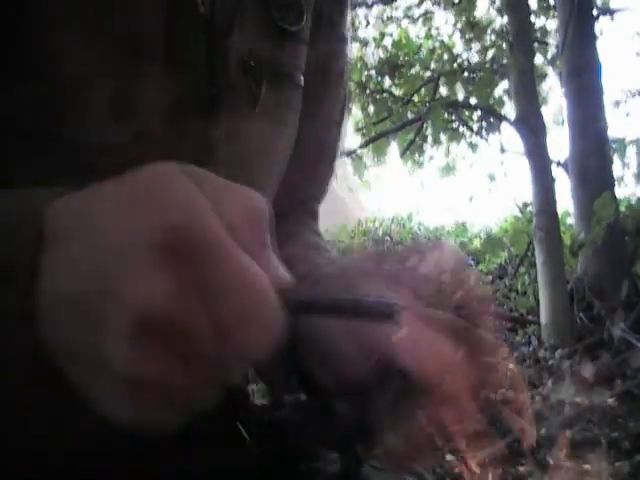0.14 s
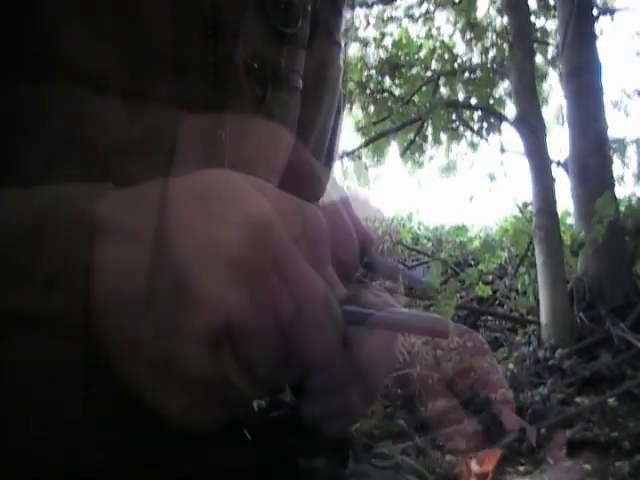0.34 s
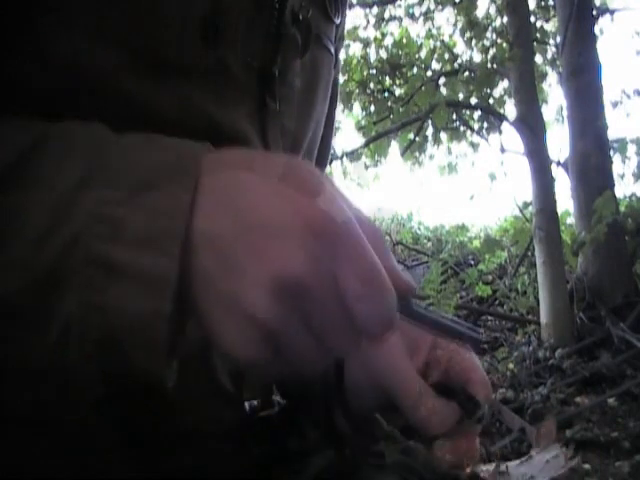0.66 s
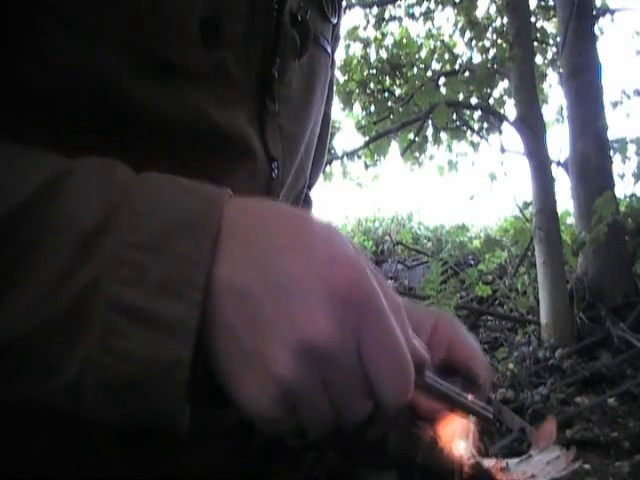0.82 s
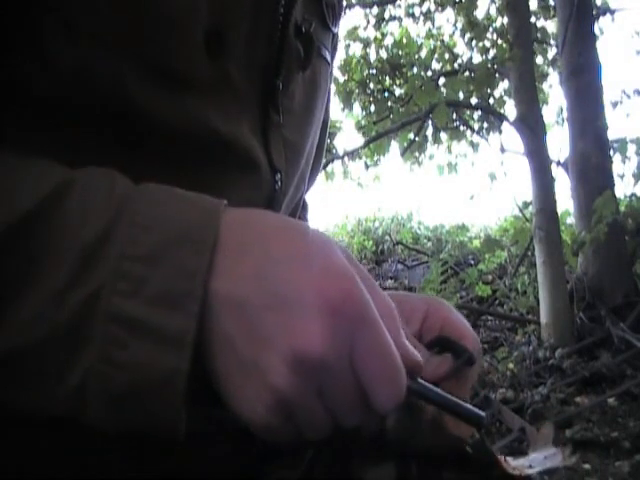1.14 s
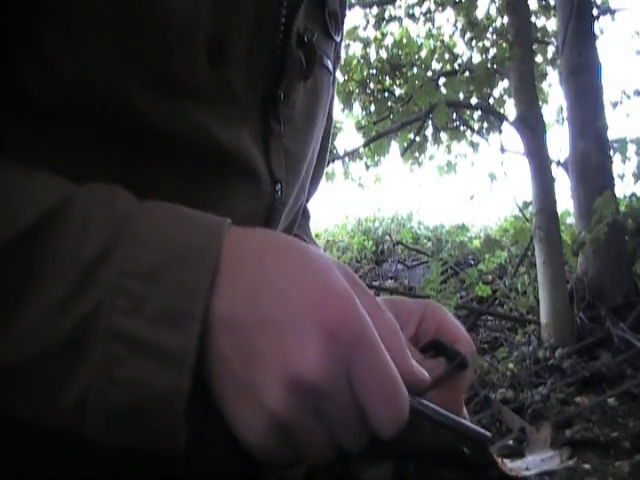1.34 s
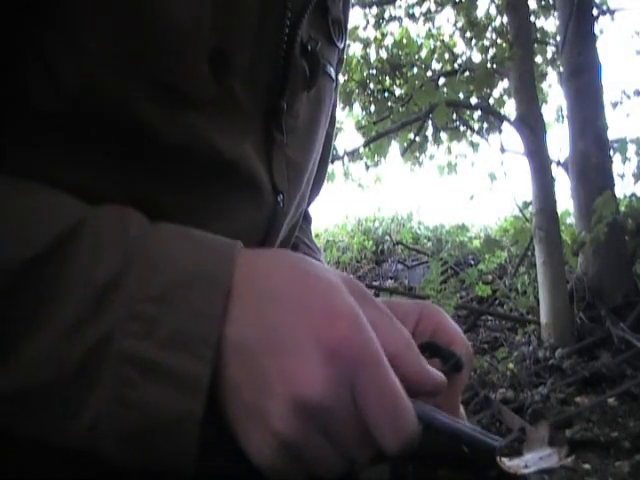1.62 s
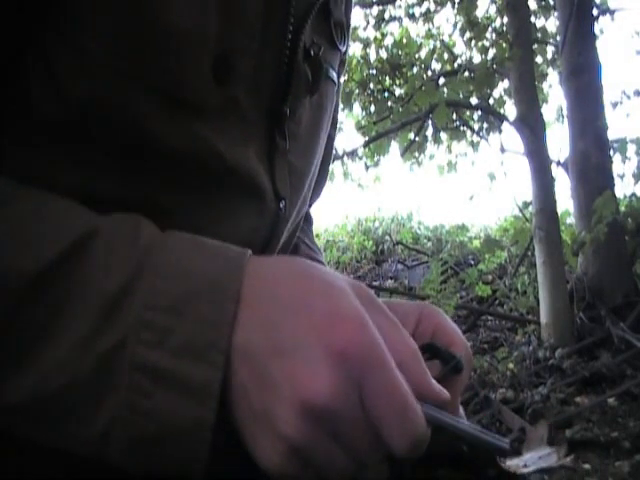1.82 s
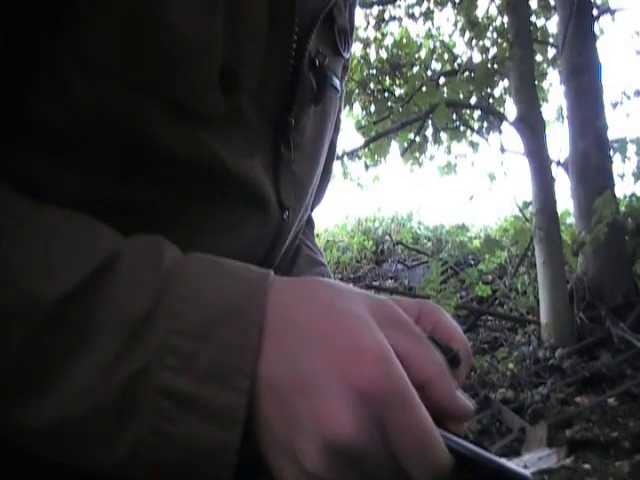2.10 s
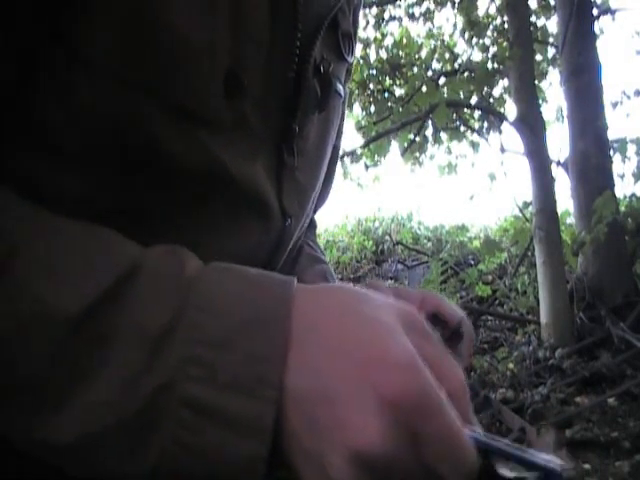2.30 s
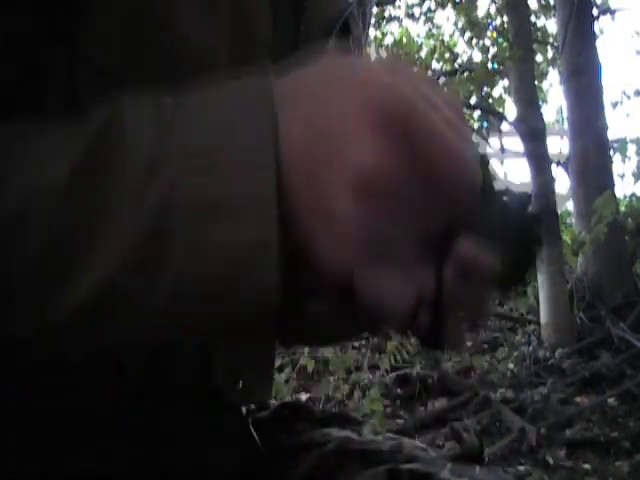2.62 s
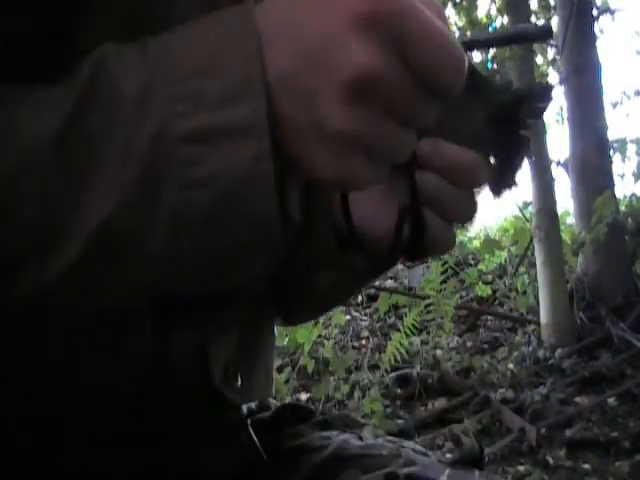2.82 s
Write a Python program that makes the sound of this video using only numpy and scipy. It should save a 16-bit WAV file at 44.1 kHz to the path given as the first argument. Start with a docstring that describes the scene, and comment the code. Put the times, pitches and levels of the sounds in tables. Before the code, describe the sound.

A metal striker rasps brightly down a fire steel, close to the microphone, followed by short scrapes and ticks. The tools knock once, then shift with soft taps, rustles and a faint jingle over a low, distant woodland rush.

```python
"""One long, bright rasp of a striker down a fire steel is heard close by, then short scrapes and ticks.
Friction drives the rasp and impacts make the ticks; both excite the brief resonance of the rod. The tools knock
once on the tinder and are shifted with dull taps, a rustle and a faint, high jingle. Behind them lies a low,
distant rush, with a nearer hiss."""
import sys
import numpy as np
from scipy import signal
from scipy.fft import rfft, irfft, next_fast_len
from scipy.io import wavfile
from scipy.ndimage import map_coordinates

SR = 44100
rng = np.random.default_rng(int(sys.argv[2]) if len(sys.argv) > 2 else 0)


def to_wav(s):
    """Save 16-bit WAV."""
    ch = np.atleast_2d(s).T  # columns
    pcm = np.round(np.clip(ch, -1, 1) * 32767)  # PCM
    wavfile.write(sys.argv[1], SR, pcm.astype(np.int16))


N = 130095
T = np.arange(N) / SR

# Envelope of the long stroke: time_s, skid_level_db, bite_level_db
STROKE_LEVELS = [(.023, -61, -59), (.029, -41.5, -44), (.048, -49, -48), (.066, -36, -39.5),
                 (.082, -26.5, -49), (.122, -24, -33), (.130, -29, -26), (.133, -22, -17.5),
                 (.144, -23, -21.5), (.148, -28, -26.5), (.168, -37, -28), (.177, -38, -24),
                 (.182, -40, -26), (.194, -46, -23), (.209, -48, -30.5), (.224, -44, -24.5),
                 (.243, -60, -30), (.256, -43, -28), (.272, -58, -42), (.312, -45, -42)]
# Spectra of the edge skidding and biting: frequency_hz, gain_db
SKID_SPECTRUM = [(300, -59), (2000, -15.5), (5800, -17), (7300, -6.5), (8000, -0.5), (8600, -1),
                 (9900, -3.5), (10800, -7), (11500, -7.5), (12800, -11), (14300, -25)]
BITE_SPECTRUM = [(60, -27.5), (200, -16), (560, -5), (1000, -7), (1520, -12), (2050, -6), (3150, -1),
                 (3700, -1), (4400, -6.5), (6300, -1.5), (7500, -1), (9400, -2), (10600, -5), (12400, -3.5),
                 (14200, -20.5)]
CHATTER_DB, STROKE_RELEASE_DB_PER_S = 1.2, 1200
def long_stroke():
    """Sliding friction: the chattering edge skids with a hiss, then bites and tears off sparks."""
    chatter_db = CHATTER_DB * wobble(rate_hz=420)
    release_db = STROKE_RELEASE_DB_PER_S * np.maximum(T - STROKE_LEVELS[-1][0], 0)
    skid, bite = amp(curve(STROKE_LEVELS) - release_db + chatter_db)
    fine, coarse = grains(per_s=20000, spread_db=3), grains(per_s=12000, spread_db=3.5)
    return coloured(skid * fine, SKID_SPECTRUM) + coloured(bite * coarse, BITE_SPECTRUM)


# Short strokes of the edge: start_s, length_s, level_db, body_db
SHORT_STROKES = [(.3225, 0.0052, -23.5, -8), (.334, 0.0042, -39, -2), (.362, 0.0074, -35.5, -5.5),
                 (.411, 0.0061, -29.5, -3.5), (.416, 0.011, -30, -4), (.442, 0.0048, -39.5, 2.5),
                 (.5155, 0.019, -32.5, -1), (.559, 0.021, -36.5, 4), (.563, 0.0035, -35, -8),
                 (.928, 0.0032, -30, -2), (.9335, 0.014, -35.5, -2), (.946, 0.0085, -40, 9),
                 (1.427, 0.008, -31, -4.5), (1.456, 0.004, -46, -1)]
def scrapes():
    """Friction in brief bursts: the edge bites the rod with a gritty rasp."""
    grit = grains(per_s=9000, spread_db=4) * amp(CHATTER_DB * wobble(rate_hz=450))
    return coloured(rubbed(SHORT_STROKES, grit, attack_s=0.00095, release_s=0.0029), BITE_SPECTRUM)


# Contacts of steel on steel: start_s, relative_level_db, body_db
STEEL_CONTACTS = [(.0305, -25.5, 0), (0.052, -28, -10), (.1083, -11, 2), (.1197, -7, -10), (.1325, -10, -3),
                  (.1445, -2, -19), (.1775, -4, -10), (.1864, -11, 1), (.2011, -13, -4), (.2365, -19, -1),
                  (.2532, -15, -11), (.2828, -22, 0), (.2942, -18.5, 6), (.3066, -16, -1), (.3275, -9.5, 7),
                  (.3686, -29, 0), (.3767, -27, 4), (.4244, -9.5, 0.5), (.4751, -21, -8), (.5158, -22, -4),
                  (.5295, -17, -12), (.5654, -11.5, 1), (.5765, -21, -5), (.6075, -30, -6), (.7947, -8, 3),
                  (.7964, -6.5, 1), (0.8331, -27, -8), (.9272, -11, -2), (.9494, -16, 7), (.9538, -10, 0),
                  (1.0903, -30.5, -4), (1.372, -19, -3), (1.3738, -26, -7), (1.4424, -29, 1),
                  (1.4926, -30.5, -3), (2.8585, -26, -5), (2.8714, -22, -12)]
# Spectrum of a contact: frequency_hz, gain_db
TICK_SPECTRUM = [(80, -27), (500, -25), (1000, -7), (1550, -19.5), (2200, -6), (2600, -5), (3200, 3.5),
                 (3700, 3), (4800, -18), (6100, 3), (7600, -3), (9500, 4.5), (12500, -1), (14000, -24)]
def ticks():
    """Hard impact: the edge catches or taps the rod, and so short a pulse has a broad spectrum."""
    return coloured(struck(STEEL_CONTACTS, decay_s=0.00062), TICK_SPECTRUM)


# Modes of the rod: pitch_hz, bandwidth_hz, relative_gain_db
ROD_MODES = [(3140, 24, 0), (6270, 32, -3), (8040, 36, -10), (8730, 80, 0), (9580, 79, 2.5)]
def rod_resonance(contacts):
    """Damped resonance: the hand-held steel adds a short ring to every contact."""
    def response(hz):
        return sum(amp(db) * 1j * hz * width / (pitch ** 2 - hz ** 2 + 1j * hz * width)
                   for pitch, width, db in ROD_MODES)
    return contacts + amp(-3) * filtered(contacts, response)


# Spectra of the knock's hard and dull parts: frequency_hz, gain_db
CLACK_SPECTRUM = [(200, -27), (1700, -15), (2250, -1.5), (2600, -7.5), (2950, 1), (3650, 5), (4200, -30),
                  (5300, -39), (5900, -3), (7700, -18), (8200, 4.5), (10500, 0), (12500, -9), (14000, -37)]
THUD_SPECTRUM = [(40, -44), (120, -14), (200, -2.5), (380, 3.5), (520, -3), (900, 1), (1400, -5.5),
                 (2200, -29)]
def knock(start_s=.9441, clack_db=8, thud_db=-3.5):
    """Impact: the tools come down on the tinder with a hard clack over a dull thud."""
    clack = coloured(placed(burst(decay_s=0.002), start_s), CLACK_SPECTRUM)
    thud = coloured(placed(burst(decay_s=0.002), start_s), THUD_SPECTRUM)
    return amp(clack_db) * clack + amp(thud_db) * thud


# Bumps of the tools in the hands: start_s, relative_level_db, body_db
HAND_TAPS = [(.8687, -21, 0), (2.1023, -35.5, 14), (2.272, -35.5, 10), (2.4119, -30.5, 6), (2.4193, -32, 4),
             (2.8055, -20, 1.5)]
# Spectrum of handling, sleeve and dry litter: frequency_hz, gain_db
HANDLING_SPECTRUM = [(150, -26), (1000, -30), (2000, -8), (3400, -1), (4700, -9), (7000, -7.5),
                     (9200, -0.5), (11500, -6), (12800, -17), (14000, -41)]
def taps():
    """Damped impact: the tools bump dully in the hands."""
    return coloured(struck(HAND_TAPS, decay_s=0.0018), HANDLING_SPECTRUM)


# Brief rings of the tools, two light clinks and the ring of the knock: start_s, pitch_hz, level_db, t60_s
TOOL_MODES = [(.4785, 7520, -26, 0.0096), (2.4, 3470, -43.5, 0.082), (.945, 3200, -29, .045)]
def tool_rings():
    """Free vibration: each brief metallic ring is one mode decaying exponentially."""
    sound = np.zeros(N)
    for start_s, hz, db, t60_s in TOOL_MODES:
        age = np.maximum(T - start_s, 0)
        sound += amp(db - 60 * age / t60_s) * np.sin(2 * np.pi * hz * age)
    return sound


# Movements of the hands: start_s, length_s, level_db, body_db
HAND_MOVES = [(.952, 0.023, -41.5, 2), (.992, 0.03, -45, -3), (2.195, 0.023, -56.5, 10),
              (2.24, 0.036, -60.5, 18.5), (2.40, 0.029, -61, 14), (2.745, 0.052, -55.5, 5),
              (2.854, 0.034, -43, -4)]
def rustles():
    """Crackling noise: tiny impulses from sleeve and dry litter merge as the hands shift."""
    crackle = grains(per_s=9000, spread_db=4)
    return coloured(rubbed(HAND_MOVES, crackle, attack_s=0.0028, release_s=0.0075), HANDLING_SPECTRUM)


# Modes of a small, loose piece of metal: pitch_hz, gain_db, t60_s
JINGLE_MODES = [(7106, -16, .2), (9022, -15, .16), (10350, -13, .35), (11600, -9, .38), (11710, -5, .28)]
# Strikes on it: start_s, relative_level_db
JINGLE_STRIKES = [(2.03, -42.5), (2.0467, -45.5)]
# Spectrum of its rattle: frequency_hz, gain_db
RATTLE_SPECTRUM = [(5000, -19), (8900, -9), (10900, -13), (11700, 3), (13500, -29)]
def jingle():
    """Modal ringing: a small piece of metal rattles, and its size puts its modes very high."""
    t = T[:SR // 2]
    def ring():
        return sum(amp(db - 60 * t / t60) * np.sin(2 * np.pi * hz * t + wobble(rate_hz=250)[:len(t)])
                   for hz, db, t60 in JINGLE_MODES)
    envelope = sum(amp(db) * swell(s, 0, attack_s=0.0012, release_s=0.011) for s, db in JINGLE_STRIKES)
    rattle = coloured(envelope * grains(per_s=4000, spread_db=1), RATTLE_SPECTRUM)
    return sum(amp(db) * placed(ring(), s) for s, db in JINGLE_STRIKES) + amp(-0.5) * rattle


# Scattered share of the sound: frequency_hz, gain_db
SCATTER_SPECTRUM = [(300, -24), (3000, -18), (6000, -10), (9000, -5), (13000, -3)]
def reflections(x, tail_db=-23, t60_s=0.25):
    """Scattering: near surfaces vary the phase between the sides; trees and ground give a faint tail."""
    quadrature = filtered(x, lambda hz: 1j * amp(along(SCATTER_SPECTRUM, hz)))
    side = quadrature * unit(np.tanh(2 * wobble(rate_hz=900)))
    tail = rng.standard_normal((2, SR // 2)) * amp(-60 * T[:SR // 2] / t60_s)
    reverberation = signal.fftconvolve(x[None], tail / np.linalg.norm(tail[0]), axes=1)[:, :N]
    return np.array([x + side, x - side]) + amp(tail_db) * reverberation


# Envelopes of the distant rush and the nearer hiss of leaves and clothing: time_s, level_db
RUSH_LEVELS = [(0, -51), (.6, -52), (1.25, -51), (1.8, -48), (2.2, -50), (2.6, -49.5), (2.95, -49)]
HISS_LEVELS = [(0, -50), (.6, -51), (.9, -54), (1.25, -57.5), (1.95, -58.5), (2.35, -56), (2.95, -53.5)]
# Their spectra: frequency_hz, gain_db
RUSH_SPECTRUM = [(25, -35), (45, -19), (62, -10.5), (95, -14), (160, -11.5), (350, -4.5), (560, -3.5),
                 (950, 2), (1200, -2.5), (1550, -8), (2400, -12), (4000, -20.5), (9000, -56)]
HISS_SPECTRUM = [(25, -20), (70, -6), (180, 5), (400, 5), (2000, 0), (3300, 2), (5000, 1.5), (9000, 1.5),
                 (12400, -3.5), (13300, -20), (14500, -44)]
# Their likeness between left and right: frequency_hz, coherence_ratio
RUSH_COHERENCE = [(30, .1), (70, 0.24), (140, 0.57), (300, 0.84), (1200, 0.91), (4000, 0.74)]
HISS_COHERENCE = [(2000, 0.98), (6000, 0.64), (12000, 0.13)]
def background_air(levels, spectrum, coherence, flutter_db=.4):
    """Partial coherence: a wavering noise sounds wider where its two sides are less alike."""
    def response(hz):
        angle = np.arccos(np.clip(along(coherence, hz), -1, 1)) / 2
        return amp(along(spectrum, hz)) * [np.cos(angle), np.sin(angle)]
    mid, side = filtered(rng.standard_normal((2, N)), response)
    envelope = amp(curve(levels) + flutter_db * wobble(rate_hz=14))
    return envelope * unit(np.array([mid + side, mid - side]))


def grains(per_s, spread_db):
    """Shot noise: tiny fractures of random size at random moments, at rms 1."""
    size = amp(spread_db * np.clip(rng.standard_normal(N), -2, 2))
    return unit((rng.random(N) < per_s / SR) * size * rng.choice([-1, 1], N))


def rubbed(rows, grain, attack_s, release_s):
    """Amplitude modulation: the grains swell once for each row."""
    swells = np.array([amp(db) * swell(s, length, attack_s, release_s) for s, length, db, _ in rows])
    body_gains = amp([row[3] for row in rows])
    return with_body(grain * swells.sum(0), grain * (body_gains @ swells))


def struck(rows, decay_s, boost_db=6):
    """Impulsive excitation: one crack for each row."""
    cracks = np.array([amp(db + boost_db) * placed(burst(decay_s), s) for s, db, _ in rows])
    body_gains = amp([row[2] for row in rows])
    return with_body(cracks.sum(0), body_gains @ cracks)


def with_body(treble, body, crossover_hz=4460):
    """Crossover: the treble of one signal joins the lower range of another, which body_db scales."""
    return treble + filtered(body - treble, lambda hz: 1 / (1 + (hz / crossover_hz) ** 8))


def burst(decay_s, size=512):
    """Transient: a crack of decaying, partly whitened noise with unit energy."""
    fade = np.exp(-np.arange(size) / SR / decay_s)
    spectrum = rfft(rng.standard_normal(size) * fade)
    crack = irfft(spectrum / np.abs(spectrum) ** .8) * np.sqrt(fade)
    return crack / np.linalg.norm(crack)


def swell(start_s, length_s, attack_s, release_s):
    """Envelope: linear attack, hold and exponential release."""
    attack = np.clip((T - start_s) / attack_s, 0, 1)
    return attack * np.exp(-np.maximum(T - start_s - length_s, 0) / release_s)


def coloured(x, spectrum, size=2048):
    """Minimum-phase filtering: a causal response of unit energy imposes the spectrum."""
    cepstrum = irfft(np.log(amp(along(spectrum, np.fft.rfftfreq(size, 1 / SR)))))
    cepstrum[1:size // 2] *= 2
    cepstrum[size // 2 + 1:] = 0
    impulse = irfft(np.exp(rfft(cepstrum)))
    return signal.fftconvolve(x, impulse / np.linalg.norm(impulse))[:N]


def filtered(x, response):
    """Linear filtering: the spectrum times a frequency response."""
    size = next_fast_len(N + SR // 2)
    return irfft(rfft(x, size) * response(np.fft.rfftfreq(size, 1 / SR)), size)[..., :N]


def placed(x, start_s):
    """Delay: x begins at start_s."""
    return np.pad(x, (int(start_s * SR), N))[:N]


def wobble(rate_hz):
    """Random modulation: a smooth curve through knots drawn at rate_hz."""
    return map_coordinates(rng.standard_normal(N), [T * rate_hz + 2], order=3)


def curve(rows):
    """Interpolation in time: one value per sample for each level column."""
    times, *columns = np.transpose(rows)
    return np.array([np.interp(T, times, column) for column in columns])


def along(points, hz):
    """Interpolation on a logarithmic frequency axis."""
    frequencies, values = np.transpose(points)
    return np.interp(np.log(hz + 1), np.log(frequencies + 1), values)


def amp(db):
    """Decibels to amplitude ratio."""
    return 10 ** (np.asarray(db) / 20)


def unit(x):
    """Normalisation to rms 1."""
    return x / np.sqrt(np.mean(x ** 2) + 1e-20)


def scene():
    """Superposition: tools and hands sound in front of the distant rush and the nearer hiss."""
    fire_steel = rod_resonance(long_stroke() + scrapes() + ticks())
    near = reflections(fire_steel + knock() + taps() + tool_rings() + rustles() + jingle())
    rush = background_air(RUSH_LEVELS, RUSH_SPECTRUM, RUSH_COHERENCE)
    hiss = background_air(HISS_LEVELS, HISS_SPECTRUM, HISS_COHERENCE)
    return near + rush + hiss


# Stereo balance: frequency_hz, left_minus_right_db
BALANCE = [(50, -2), (200, -5.5), (700, -4), (2400, -4), (5500, -2.5), (8500, -2), (11000, -4.5),
           (13500, -9)]
def record(dry, ceiling=.92, cutoff_hz=14600):
    """Saturation and band limiting: the sound leans right, its peaks round off, its top is cut."""
    panned = filtered(dry, lambda hz: amp(along(BALANCE, hz) * np.array([[.5], [-.5]])))
    rounded = panned / (1 + np.abs(panned / ceiling) ** 6) ** (1 / 6)
    return filtered(rounded, lambda hz: 1 / (1 + (hz / cutoff_hz) ** 100))


dry = scene()
out = record(dry)
to_wav(out)
```